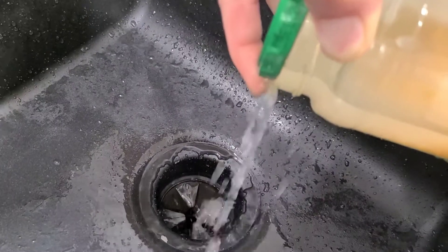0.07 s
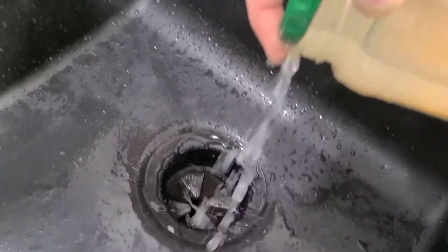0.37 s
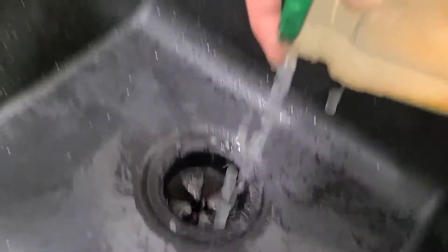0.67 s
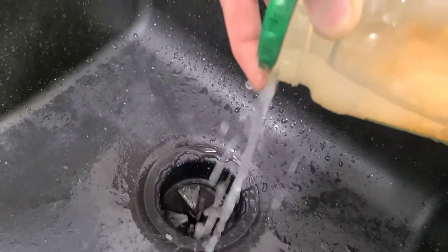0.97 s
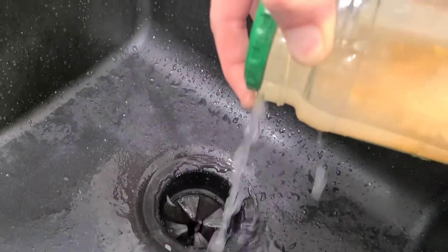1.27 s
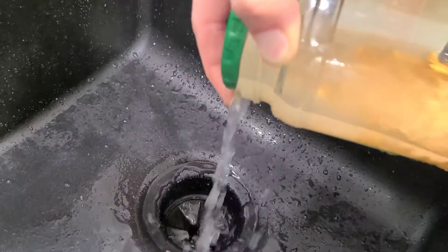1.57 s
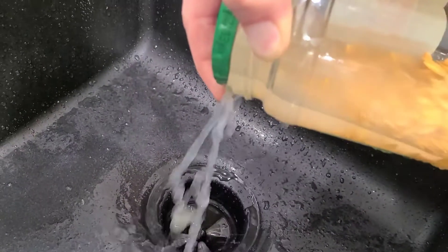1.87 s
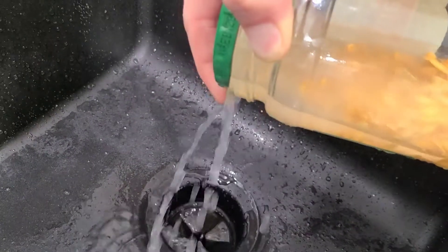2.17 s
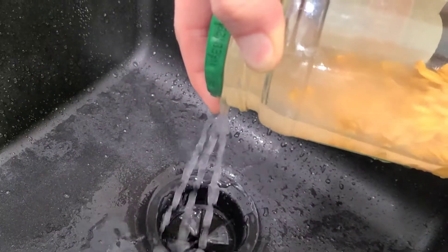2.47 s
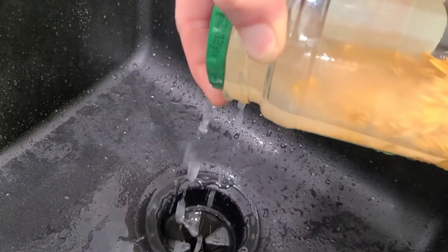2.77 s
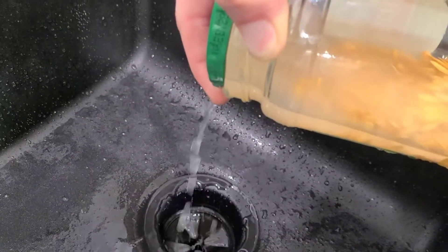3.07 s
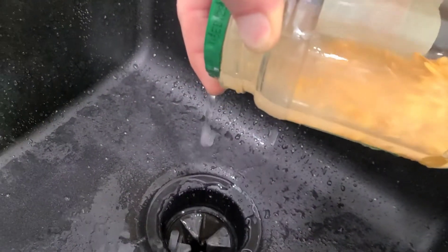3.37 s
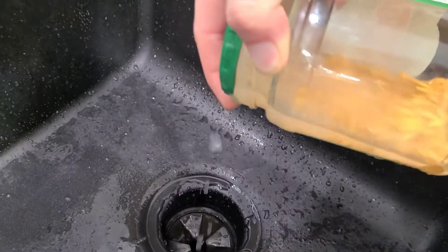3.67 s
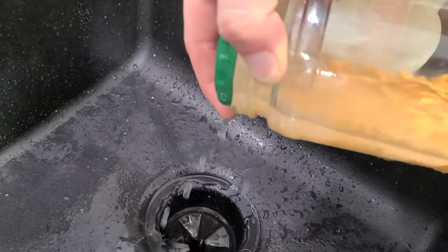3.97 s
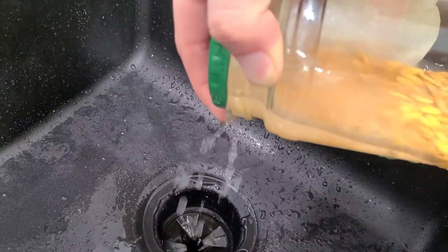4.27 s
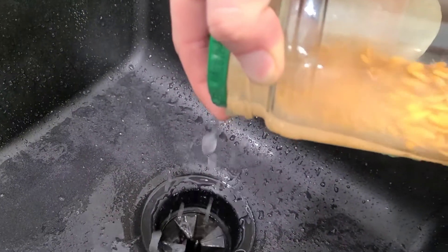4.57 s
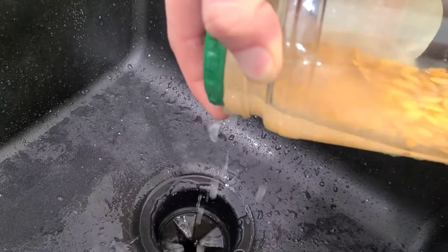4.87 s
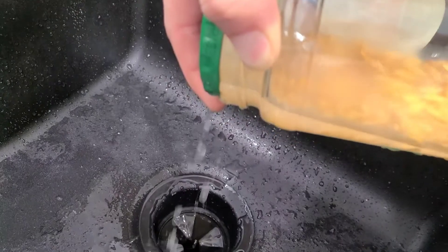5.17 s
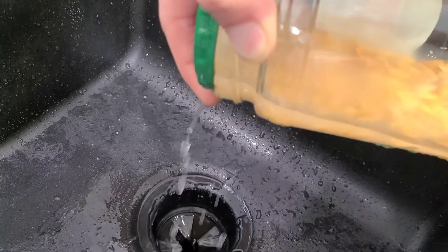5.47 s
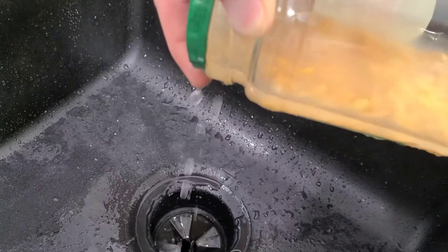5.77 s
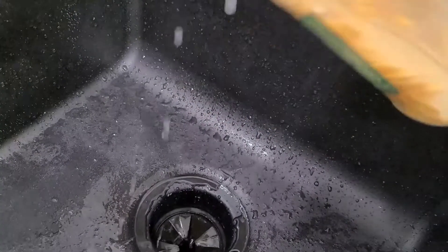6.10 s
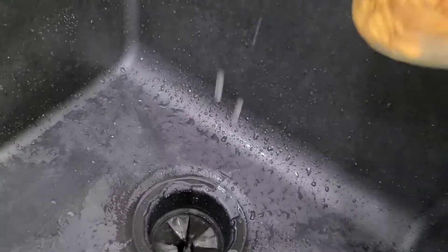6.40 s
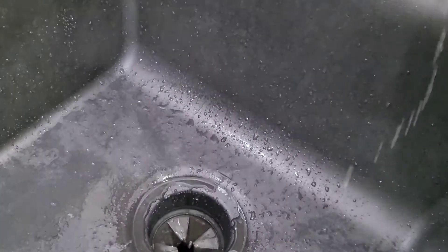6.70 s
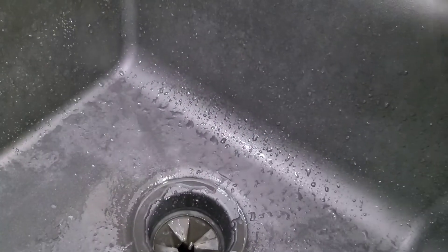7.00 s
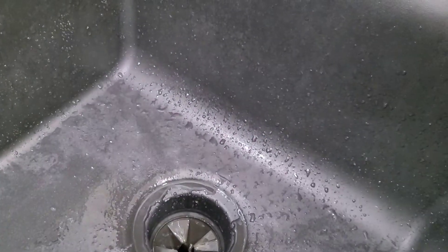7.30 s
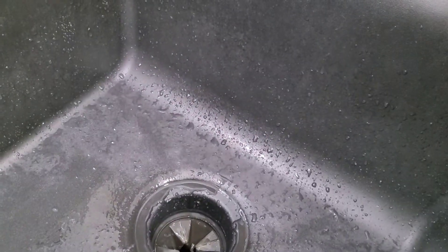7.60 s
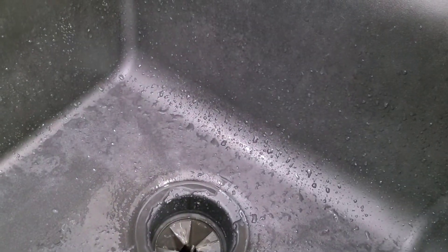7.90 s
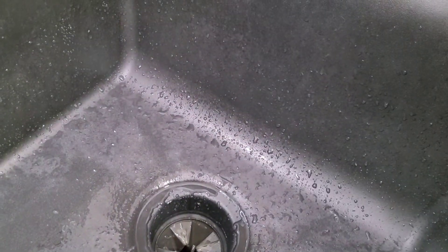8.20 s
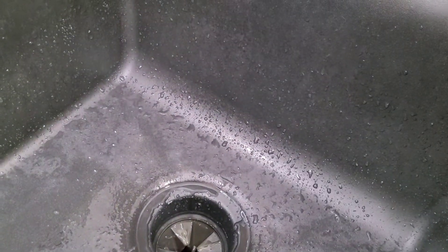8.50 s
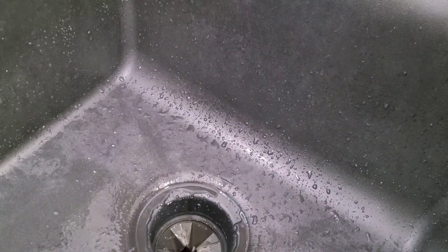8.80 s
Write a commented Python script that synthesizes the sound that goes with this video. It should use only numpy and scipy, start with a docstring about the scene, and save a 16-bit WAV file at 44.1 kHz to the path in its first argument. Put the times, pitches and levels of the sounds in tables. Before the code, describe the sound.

From the start, water poured from a plastic jar splatters unevenly into a kitchen sink, close to the microphones. Crisp splats hit the wet basin, mixed with tiny high bubbles, low plops on the rubber drain flaps and a soft gurgle. The drain gives a small gulp at about 2.5 seconds. From around 3 seconds the stream thins to irregular drips, and the jar gives a faint slosh and a few light ticks near 3.5 seconds. The dripping ends at about 6.7 seconds.

At 7.2 seconds the jar is set on the counter with a sharp, hollow knock, followed by soft bumps. A lid clacks at 8 seconds, and a dish clanks brightly several times around 8.5 seconds, with one last dull bump after it. These knocks sit slightly to the right and carry a short room echo. A faint low kitchen hum continues throughout.

```python
"""Water splats into a kitchen sink, strained out of a plastic jar close to a stereo microphone pair.
The broken stream cracks on the wet basin, drums on the rubber flaps of the drain and traps small
bubbles, then thins to drips. Afterwards the jar is set down on the counter, a lid clacks and a dish
clanks, a little to the right. Behind it all the kitchen hums faintly."""
import sys
import numpy as np
from scipy import signal
from scipy.fft import rfft, irfft, next_fast_len
from scipy.io import wavfile
from scipy.ndimage import uniform_filter1d

SR = 44100
rng = np.random.default_rng(int(sys.argv[2]) if len(sys.argv) > 2 else 0)


def wrap_up_sound(samples):
    """Save the sound to the file named by the first command line argument, as 16-bit audio."""
    columns = np.atleast_2d(samples).T
    # keep every value between -1 and 1, then stretch to whole-number steps
    tamed = np.clip(columns, -1, 1)
    steps = np.round(tamed * 32767).astype(np.int16)
    wavfile.write(sys.argv[1], SR, steps)


N = 390285
POUR_END_S = 6.55

# The pour at the sink, from a stream down to drips: time_s, level_db
POUR_FLOW = [(0.0, -48.5), (0.39, -59), (0.97, -50), (1.75, -59.5), (2.14, -54), (2.35, -57), (2.67, -48.5),
             (3.47, -75.5), (3.77, -68.5), (3.86, -70), (4.44, -74.5), (4.63, -70), (4.79, -75),
             (5.58, -73.5), (5.75, -90), (6.7, -76)]


def pour_strength(full_pour_db=-56.5):
    """The flow at every sample, in dB relative to a full pour."""
    return curve(POUR_FLOW) - full_pour_db


def lesser_drops(flow_db, per_s, level_db, follow, spread_db):
    """The stream pinches off drops at a loose pace, weaker as it thins: start_s, level_db."""
    slots = np.arange(0, POUR_END_S, 1 / per_s)
    late, size = rng.random((200, 2))[:len(slots)].T
    when = np.minimum(slots + late / per_s, POUR_END_S)
    return zip(when, level_db + follow * flow_db[(when * SR).astype(int)] + spread_db * (size - .5))


# The largest slugs on the basin, close up: start_s, level_db, body_relative_db, fizz_relative_db
BASIN_SPLATS = [(0.0248, -39.5, 0, 14), (0.042, -32, -18, -8), (0.054, -38, 3.5, 0),
                (0.3175, -33.5, -19, 11), (0.4186, -37, -28, -21), (0.606, -21, -1, 4),
                (0.645, -29.5, -4.5, 4.5), (0.7387, -30, -20, -2), (0.826, -32, -2, -2),
                (0.849, -25.5, -7.5, 9), (0.8978, -27, -5, 4), (0.991, -28.5, -16, 10),
                (1.096, -34, -3, -15), (1.122, -27.5, -17, -5), (1.289, -46.5, -17, 17),
                (1.3233, -31.5, -11, 7), (1.485, -20.5, -20, 1), (1.6412, -38.5, -30, 1),
                (1.755, -39, -11, -1), (1.8288, -30, -12, -4), (2.0262, -29, -8.5, 0),
                (2.047, -30, -11, 6.5), (2.123, -31, -8, -3), (2.147, -27.5, -6.5, -5),
                (2.174, -26.5, -26, 1), (2.282, -35, 1.5, -21), (2.439, -27, -15.5, -4.5),
                (2.4628, -33, -18, 8.5), (2.499, -33, -6.5, 5.5), (2.552, -23.5, -18, -14),
                (2.657, -28.5, -12, -19), (2.711, -32.5, -10, 10), (2.9953, -35, -16, -10),
                (3.0673, -41.5, -18, 2), (3.088, -50.5, -4, 14), (3.218, -37, -30, -16),
                (3.6836, -33.5, -13, -5), (3.9712, -40, -21, 2), (4.395, -35.5, -20, -13),
                (4.455, -33.5, -11, -0.5), (4.555, -42, -16, -25), (4.624, -40, -2, -7),
                (4.6483, -45, -15, 6), (4.698, -43, -18, 0), (4.8928, -43, -27, -25),
                (5.1038, -32.5, -32, 7.5), (5.191, -35, -13, -14), (5.5948, -45, -13, 12),
                (5.6196, -31.5, -16.5, -2), (6.0132, -45, -6, -5)]


def splats(flow_db, attack_ms=0.5, decay_ms=3.47, fizz_ms=3.45, scatter_ms=14):
    """Each slug bursts with a crack and a fizz of tiny bubbles; the droplets it throws land just after."""
    out, ms = np.zeros((2, N)), np.arange(4096) * 1000 / SR
    drops = lesser_drops(flow_db, per_s=11, level_db=-42.5, follow=0.42, spread_db=5.5)
    small = [(s, db, -11.5, rng.normal(-8, 9)) for s, db in drops]
    attack = 1 - np.exp(-ms / attack_ms)
    for s, db, body_db, fizz_db in BASIN_SPLATS + small:
        body = noise([(1200, -58), (2300, -8), (3100, 2), (4400, 8), (5600, -15)], len(ms))
        snap = noise([(3500, -28.5), (5000, -4.5), (6500, 8), (7300, 6), (8400, -12.5), (11000, -31)],
                     len(ms))
        fizz = noise([(6000, -45), (8500, -9), (10500, -7), (12500, 1.5), (16000, 1)], len(ms))
        foam = ragged(spread_db=4, count=56)
        flicker = unit(uniform_filter1d(rng.standard_normal(len(ms)), 60))
        scatter = amp(-18) * np.exp(0.66 * flicker - ms / scatter_ms)
        crack = colour(snap + amp(body_db) * body, foam) * (1.44 * np.exp(-ms / decay_ms) + scatter)
        froth = amp(fizz_db + 3) * colour(fizz, foam) * (1.07 * np.exp(-ms / fizz_ms) + scatter)
        add(out, s - .0004, amp(db + 4) * attack * (crack + froth) / 2)
    return out


# Heavy drops on the drain flaps: start_s, level_db, tap_relative_db
FLAP_DROPS = [(0.493, -26.5, -22), (0.640, -36, -24), (0.690, -33, -17), (0.88, -27.5, -10),
              (1.221, -26.5, -23), (1.662, -34, -12), (1.723, -32, -21), (1.761, -29.5, -21),
              (1.790, -28, -17.5), (2.117, -23, -20), (2.234, -23, -14), (2.592, -34, -18),
              (2.779, -32, -18), (2.792, -27.5, -30), (2.87, -35, -20), (3.435, -36, -26),
              (3.637, -39, -9.5), (4.043, -31.5, -21), (4.379, -33, -12), (4.469, -21, -12),
              (4.527, -30, -21), (4.548, -30.5, -26), (4.69, -31.5, -18), (4.890, -38.5, -20),
              (5.129, -35.5, -24), (5.34, -35, -23), (5.574, -36.5, -20), (5.793, -25.5, -16.5),
              (6.019, -32.5, -19), (6.418, -37.5, -10.5), (6.517, -35, -15), (6.64, -34.5, -13)]
# The hollow under the flaps, and the rubber itself: pitch_hz, level_db, t60_s
HOLLOW_MODES = [(203.1, 3, 0.13), (213, -12.5, 0.045), (322.3, -13, 0.11), (445, -15, 0.041)]
FLAP_MODES = [(1859, -4, 0.12), (1934, 3, 0.11), (2230, -17.5, 0.064), (2820, -6, 0.079),
              (1210, -9.5, 0.093)]


def plops(flow_db, swell_ms=5, slap_ms=5, light_tap_db=-18):
    """Each drop slaps a rubber flap at another spot; the hollow below swells into a low note."""
    out, t = np.zeros((2, N)), np.arange(SR // 5) / SR
    drops = lesser_drops(flow_db, per_s=2.6, level_db=-41, follow=.1, spread_db=6)
    light = [(s, db, light_tap_db) for s, db in drops]
    slap_spectrum = [(300, -6), (900, 11.5), (1400, -15.5), (2400, -12), (3200, 3.5), (6000, -19.5)]
    for s, db, tap_db in FLAP_DROPS + light:
        boom = ring(HOLLOW_MODES, t * rng.uniform(0.99, 1.03)) * (1 - np.exp(-t * 1000 / swell_ms))
        spot = [(hz * rng.uniform(0.95, 1.045), mode_db + rng.normal(0, 5), t60)
                for hz, mode_db, t60 in FLAP_MODES]
        slap = noise(slap_spectrum, len(t)) * np.exp(-t * 1000 / slap_ms)
        tap = ring(spot, t) + amp(-1) * slap
        add(out, s, amp(db) * (amp(2) * boom + amp(tap_db - 2) * tap))
    return out


def bubble(hz, decay_ms, rise_octaves):
    """A trapped bubble rings and goes up in pitch as it nears the surface."""
    ms = np.arange(2400) * 1000 / SR
    pitch = hz * 2 ** (rise_octaves * (1 - np.exp(-ms / 10)))
    mic_phase = np.array([[-1], [1]]) * rng.uniform(-0.8, 1)
    envelope = np.exp(-ms / decay_ms) * (1 - np.exp(-ms / .5))
    return envelope * np.sin(2 * np.pi * np.cumsum(pitch) / SR + mic_phase)


# Bubbles that stand out in the basin: start_s, pitch_hz, level_db, rise_octaves
CLEAR_BUBBLES = [(0.607, 6360, -15.5, 0.05), (0.691, 2770, -32, 0.04), (0.829, 5680, -29, 0.11),
                 (1.486, 6830, -20, 0.084), (1.807, 3900, -26, 0.71), (2.128, 3940, -27, 0.36),
                 (2.138, 2760, -28.5, 0.33), (2.551, 4100, -29.5, 0.33), (2.676, 2940, -34.5, 0.28),
                 (6.035, 5500, -39.5, 0.066), (6.418, 4490, -36, 0.21)]


def bubbles(flow_db, tiny_db=-44, follow=0.85, spread_db=6, tiny_hz=6500, lower_hz=3600, count=320):
    """A few clear bubbles and many tiny ones; a strong stream traps larger, lower ones too."""
    out = np.zeros((2, N))
    for s, hz, db, rise in CLEAR_BUBBLES:
        add(out, s, amp(db + 2) * bubble(hz, decay_ms=4.1, rise_octaves=rise))
    for when, pitch, detune, size, life in rng.random((count, 5)):
        s = when * POUR_END_S
        pour_db = flow_db[int(s * SR)]
        strength = np.clip(0.713 + pour_db / 24, 0, 1)
        hz = tiny_hz * (1 + 0.15 * (detune - .5)) - lower_hz * strength * pitch ** 2
        db = tiny_db + follow * pour_db + spread_db * size ** 2
        add(out, s, amp(db) * bubble(hz, decay_ms=0.56 + 1.6 * life, rise_octaves=0))
    return out


def pips(flow_db, pitch_hz=6650):
    """Small drops of much the same size each trap one bubble, so their pips share nearly one pitch."""
    out = np.zeros((2, N))
    for s, db in lesser_drops(flow_db, per_s=11, level_db=-36, follow=0.46, spread_db=10):
        hz = pitch_hz * (1 + .07 * rng.uniform(-1, 1))
        add(out, s, amp(db) * bubble(hz, decay_ms=3.05, rise_octaves=0.027))
    return out


# Drops that ping down in the drain: start_s, level_db
DRAIN_PINGS = [(2.0, -43), (2.027, -35.5), (2.391, -45), (2.829, -44), (2.868, -42), (3.968, -36),
               (6.528, -44.5)]
# The ring they set off: pitch_hz, level_db, t60_s
PING_MODES = [(3530, 0, .12), (3370, -7, .08), (3240, -9, .1)]


def pings(attack_ms=0.95, detune=0.0066):
    """Some drops set off the same thin, longer ring in the drain."""
    out, t = np.zeros((2, N)), np.arange(SR // 5) / SR
    attack = 1 - np.exp(-t * 1000 / attack_ms)
    for s, db in DRAIN_PINGS:
        tuning = 1 + detune * rng.standard_normal()
        add(out, s, amp(db - 2) * ring(PING_MODES, t * tuning) * attack)
    return out


def clumps(per_s, spread_db, decay_ms, steady):
    """The stream breaks into lumps; each lands with a sudden flurry that dies away."""
    lumps = amp(spread_db * np.minimum(rng.exponential(1, N), 3)) * (rng.random(N) < per_s / SR)
    flurry = signal.lfilter([1], [1, -np.exp(-1000 / (decay_ms * SR))], lumps)
    return unit(steady + unit(flurry))


# Spray and patter on the basin, gurgle down in the drain: frequency_hz, level_db
SPRAY_SPECTRUM = [(5000, -44), (7000, 0.5), (8600, -19.5), (10500, -7), (13000, 3), (16000, -4.5)]
PATTER_SPECTRUM = [(300, 10), (1000, -14), (2200, -2), (3500, 0.5), (5000, -6.5), (6600, 7), (8000, -6),
                   (10000, -29)]
GURGLE_SPECTRUM = [(120, -17), (200, 14), (350, 5.5), (540, 2.5), (820, -1.5), (1500, -7), (2400, -8.5),
                   (4000, -35), (8000, -57)]


def stream(flow_db, run_off_s=0.19):
    """Fine spray, coarser patter and the gurgle in the drain die away with the pour."""
    running = 1 - swell(POUR_END_S + run_off_s / 2, N / SR, run_off_s)
    pouring = running * clumps(per_s=70, spread_db=4, decay_ms=7, steady=.4)
    surge_db = 0.8 * np.maximum(flow_db, 0)  # extra patter above a full pour
    spray = droplets(SPRAY_SPECTRUM, per_s=3500, spread_db=1) * amp(-51 + flow_db)
    patter = droplets(PATTER_SPECTRUM, per_s=700, spread_db=-3.5) * amp(-57 + 0.67 * flow_db + surge_db)
    gurgle = droplets(GURGLE_SPECTRUM, per_s=400, spread_db=5.5) * amp(-52.5 + 0.24 * flow_db)
    return pouring * (spray + patter) + running * gurgle


# The hollow of the drain as it swallows: frequency_hz, level_db
GULP_SPECTRUM = [(150, -16), (300, 9), (560, -5), (820, 8), (1100, -5), (1500, -2), (2000, -9), (2450, 3),
                 (3200, -21), (6000, -35)]


def gulp():
    """The drain swallows one gush."""
    gush = swell(start_s=2.465, length_s=0.11, fade_s=.04)
    return droplets(GULP_SPECTRUM, per_s=600, spread_db=3) * amp(-43.5) * gush


# Water shifting in the jar above the sink: time_s, level_db
SLOSH_LEVEL = [(3.12, -75), (3.2, -52.5), (3.26, -48), (3.32, -53), (3.42, -64)]
# The hollow of the jar: frequency_hz, level_db
SLOSH_SPECTRUM = [(200, -15), (400, 11.5), (550, -4), (690, 14.5), (900, -22), (2000, -47)]


def slosh():
    """Water stirs faintly inside the tilted jar and sloshes once."""
    return droplets(SLOSH_SPECTRUM, per_s=440, spread_db=2.5) * amp(curve(SLOSH_LEVEL))


def knocks(blows, modes, contact, low_t60_s, high_t60_s, attack_ms, lag_rad, gain_db):
    """Each blow is a burst of contact noise plus the object's modes; soft blows lose their treble."""
    out, t = np.zeros((2, N)), np.arange(SR // 2) / SR
    overtones = ragged(spread_db=6, count=260)  # the object's crowded high modes
    attack = 1 - np.exp(-t * 1000 / attack_ms)
    for s, db, cutoff_hz, ring_db in blows:
        burst = noise(contact, len(t))
        low = colour(burst, [(2000, -1.5), (4500, -41), (9000, -48.5)])
        high = 0.72 * colour(burst - low, overtones)
        crack = low * amp(-60 * t / low_t60_s) + high * amp(-60 * t / high_t60_s)
        blow = (crack + amp(ring_db) * ring(modes, t, lag_rad)) * attack
        lowpass = signal.butter(2, cutoff_hz, fs=SR)
        add(out, s, amp(db + gain_db) * signal.lfilter(*lowpass, blow))
    return out


# The jar in the hand, then on the counter: start_s, level_db, cutoff_hz, ring_relative_db
JAR_TICKS = [(3.394, -37, 8750, -17), (3.481, -38, 1200, -19), (3.495, -32, 9000, -26),
             (7.607, -42, 3970, -22)]
JAR_BLOWS = [(7.1845, -11, 15000, 1.5), (7.193, -23, 2500, -6)]
# Its plastic body: pitch_hz, level_db, t60_s
JAR_MODES = [(128, 2, 0.11), (293, -16, 0.18), (376, -10.5, 0.34), (439.6, 4.5, 0.19), (532, -3, 0.23),
             (674, 8.5, 0.1), (723, -16, 0.13), (905, 5.5, 0.17), (1040, 2, 0.13), (1185, 4, 0.11),
             (1180, 0, .11), (1533, -15, 0.24), (1804, -11, .12), (2035, -10, 0.33), (2555, -4, 0.092),
             (3750, -26.5, 0.15)]
# Contact noise of a tick and of a blow: frequency_hz, level_db
TICK_CONTACT = [(150, -4), (500, 9.5), (1200, 0.5), (3300, -7.5), (6000, -19.5), (14000, -42)]
JAR_CONTACT = [(30, -31), (70, -26.5), (200, -15.5), (420, -11), (950, -11), (1500, -18), (2100, -17.5),
               (2900, -24.5), (3900, -14), (4600, -31), (5500, -23.5), (7000, -29), (9000, -48.5),
               (14000, -38.5)]


def jar_ticks():
    """The plastic jar ticks as it is handled, barely ringing."""
    return knocks(JAR_TICKS, JAR_MODES, TICK_CONTACT,
                  low_t60_s=0.018, high_t60_s=0.06, attack_ms=0.078, lag_rad=0.65, gain_db=4.5)


def jar_set_down():
    """The jar meets the counter in a quick double knock."""
    return knocks(JAR_BLOWS, JAR_MODES, JAR_CONTACT,
                  low_t60_s=0.28, high_t60_s=0.063, attack_ms=0.83, lag_rad=0.64, gain_db=0.5)


# The lid, a little right of the microphones: start_s, level_db, cutoff_hz, ring_relative_db
LID_BLOWS = [(7.9785, -19.5, 18000, 0), (7.990, -23, 5000, -14)]
# Its ring: pitch_hz, level_db, t60_s
LID_MODES = [(366, -12.5, 0.11), (647, -8, 0.052), (1215, -7.5, 0.11), (1686, -15, 0.11), (2120, -1, 0.048),
             (2340, -7, 0.081), (2420, -10.5, 0.14), (2500, -22, .2), (3130, -18, 0.082),
             (3240, -11, 0.092), (3480, -16, .1), (4380, -16, 0.084), (5300, -27, 0.14), (6170, -29, 0.13)]
# Its contact noise: frequency_hz, level_db
LID_CONTACT = [(150, -41), (350, -9), (900, -14), (1600, -17), (2400, -0.5), (3600, -3.5), (5000, -15),
               (6500, -14), (9000, -40), (12000, -20.5), (16000, -23)]


def lid_clack():
    """A lid strikes twice in one short clack."""
    return knocks(LID_BLOWS, LID_MODES, LID_CONTACT,
                  low_t60_s=0.059, high_t60_s=0.055, attack_ms=1.9, lag_rad=0.62, gain_db=3.5)


# The dish, also a little to the right: start_s, level_db, cutoff_hz, ring_relative_db
DISH_BLOWS = [(8.444, -26.5, 12400, 6.3), (8.456, -20, 18000, 4.6), (8.544, -35, 4000, 2.7),
              (8.576, -14, 18200, 2.1), (8.596, -16, 18000, 1.4)]
# Its ring: pitch_hz, level_db, t60_s
DISH_MODES = [(370, -0.5, 0.28), (443.6, -3, 0.23), (722, 0, 0.14), (1040, -6, 0.15), (1272, 11.5, 0.13),
              (1610, -28, 0.61), (2260, 7, 0.065), (2340, -9, 0.099), (2577, 11, 0.081), (3000, -28, 0.2),
              (3110, -11, 0.13), (3280, -5.5, 0.24), (3370, -0.5, 0.17), (4242, -19, 0.23),
              (4400, -25, 0.45), (4730, -28, 0.19), (5500, -35, .25), (5744, -27, 0.2), (6126, -18, 0.26),
              (6420, -34, 0.15), (6860, -23, .24), (7580, -23, 0.14), (11600, -16, 0.11), (13800, -13, 0.1)]
# Its contact noise: frequency_hz, level_db
DISH_CONTACT = [(150, -31), (380, 1.5), (560, -8.5), (750, -6.5), (1700, -9.5), (2500, -3), (3400, -2.5),
                (3800, -18), (4700, -12), (6500, -10), (9000, -27.5), (12500, -14), (16000, -19)]


def dish_clank():
    """A dish rings brightly under a quick run of blows."""
    return knocks(DISH_BLOWS, DISH_MODES, DISH_CONTACT,
                  low_t60_s=0.15, high_t60_s=0.12, attack_ms=3.4, lag_rad=0.51, gain_db=2)


# Soft bumps among the knocks: start_s, level_db, cutoff_hz, ring_relative_db
SOFT_BUMPS = [(7.399, -33, 1290, 7), (7.408, -34.5, 1200, 4), (7.459, -40.5, 1200, 2),
              (7.560, -49, 885, 10.5), (7.779, -42, 1260, 11), (8.554, -33, 1300, 4.5),
              (8.800, -32.5, 1420, 6.5)]
# Their dull ring: pitch_hz, level_db, t60_s
BUMP_MODES = [(421, -9.5, 0.24), (525, 2.5, 0.096), (614, 7, 0.047), (733, -3, 0.081), (880, -6.5, 0.082),
              (1160, -9.5, 0.1)]


def bumps():
    """The things being handled bump softly, with little treble."""
    return knocks(SOFT_BUMPS, BUMP_MODES, JAR_CONTACT,
                  low_t60_s=0.11, high_t60_s=0.076, attack_ms=1.7, lag_rad=0.41, gain_db=6)


# Room tone behind the sink: frequency_hz, level_db
AIR_SPECTRUM = [(20, -32), (32, -11.5), (55, 1), (100, -2.5), (170, -9.5), (260, -19), (400, -16.5),
                (550, -20.5), (1050, -15.5), (2000, -22), (3000, -29.5), (5000, -36.5), (6700, -32),
                (9000, -60.5), (13000, -45.5)]
# Swells of the background hum: start_s, length_s
HUM_SWELLS = [(.2, 1.0), (2.0, 1.36), (5.85, 0.59)]


def kitchen(air_db=-48.5, hum_db=-54, swell_db=8):
    """Steady room air and a wavering low hum that swells now and then."""
    hum = noise([(60, -61), (112, -27), (124, 3), (130, 4), (138, 0.5), (160, -35), (300, -80)], N)
    louder = sum(swell(s, length, fade_s=0.17) for s, length in HUM_SWELLS)
    return amp(air_db) * noise(AIR_SPECTRUM, N) + amp(hum_db + swell_db * louder) * hum


def droplets(spectrum, per_s, spread_db):
    """Tiny random impacts, rms 1; a positive spread makes a few louder, a negative one a few softer."""
    clicks = np.zeros((2, N))
    when, side, sign, size = rng.random((int(2 * per_s * N / SR), 4)).T
    strength = amp(-spread_db * np.log(size + 0.018))
    clicks[(2 * side).astype(int), (when * N).astype(int)] = np.sign(sign - .5) * strength
    return unit(colour(clicks, spectrum))


def ring(modes, t, lag_rad=0.37):
    """Dying modes, t60 capped at 0.6 s; the right microphone leads the left by twice lag_rad."""
    mic_phase = np.array([[-lag_rad], [lag_rad]])
    out = sum(amp(db - 60 * t / min(t60, .6)) * np.sin(2 * np.pi * hz * t + mic_phase)
              for hz, db, t60 in modes)
    return out / np.sqrt(sum(amp(db) ** 2 for _, db, _ in modes) / 2)


def echoes(x, t60s, delay_s, size):
    """Sparse reflections of random sign, each band dying at its own speed."""
    taps = rng.choice([-1., 1.], (2, size)) * (rng.random((2, size)) < .1)
    hz, t, bands = signal.stft(taps, SR, nperseg=128)
    decay = amp(-60 * t / read(t60s, hz)[:, None])
    tail = signal.istft(bands * decay, SR, nperseg=128)[1]
    tail[:, :round(delay_s * SR)] = 0
    tail /= np.linalg.norm(tail, axis=1, keepdims=True)
    return signal.oaconvolve(x, tail, axes=1)[:, :N]


def amp(db):
    """Decibels to gain."""
    return 10 ** (np.asarray(db) / 20)


def unit(x):
    """Scales to rms 1."""
    return x / np.sqrt(np.mean(x ** 2) + 1e-20)


def read(points, hz):
    """Reads a table on a log-frequency axis."""
    f, value = np.transpose(points)
    return np.interp(np.log(hz + 1), np.log(f + 1), value)


def curve(rows):
    """A time table at every sample."""
    return np.interp(np.arange(N) / SR, *np.transpose(rows))


def swell(start_s, length_s, fade_s):
    """Rises from 0 to 1 and falls back, with length_s between the fades' midpoints."""
    t = np.arange(N) / SR - start_s
    return np.clip(np.minimum(t, length_s - t) / fade_s + .5, 0, 1)


def add(mix, s, sound):
    """Mixes a sound in at second s."""
    part = mix[:, max(round(s * SR), 0):][:, :sound.shape[-1]]
    part += sound[..., :part.shape[1]]


def colour(x, spectrum):
    """Filters by a spectrum table."""
    size = next_fast_len(x.shape[-1])
    gain = amp(read(spectrum, np.fft.rfftfreq(size, 1 / SR)))
    return irfft(rfft(x, size) * gain, size)[..., :x.shape[-1]]


def noise(spectrum, size):
    """Two channels of coloured noise, rms 1."""
    return unit(colour(rng.standard_normal((2, size)), spectrum))


def ragged(spread_db, count):
    """A spectrum table of many small random resonances, evenly spaced."""
    level_db = spread_db * np.clip(rng.standard_normal(count), -2, 2)
    return np.column_stack([np.linspace(0, SR / 2, count), level_db])


def pan(x, left_db):
    """Leans a sound to the left, or to the right if negative."""
    return x * amp(np.array([[left_db], [-left_db]]) / 2)


# The kitchen's reverberation, heard from the sink: frequency_hz, t60_s
KITCHEN_DECAY = [(100, 0.35), (400, 0.46), (1200, 0.43), (3000, 0.43), (7000, 0.4), (15000, 0.27)]


def scene(basin_db=-7, water_room_db=-18, knock_room_db=-11):
    """Water echoes briefly between the sink walls; the knocks wake the whole kitchen."""
    flow_db = pour_strength()
    water = splats(flow_db) + bubbles(flow_db) + pips(flow_db) + pings()
    water += stream(flow_db) + gulp() + slosh()
    basin = echoes(water, [(500, 0.12), (6500, 0.091), (14000, 0.079)], delay_s=0.0034, size=6000)
    sink = water + amp(basin_db) * basin + plops(flow_db) + jar_ticks()
    handling = jar_set_down() + bumps() + lid_clack() + dish_clank()
    into_room = amp(water_room_db) * sink + amp(knock_room_db) * handling
    room = echoes(into_room, KITCHEN_DECAY, delay_s=0.0043, size=24000)
    return sink + pan(handling, left_db=-2) + room + kitchen()


# Stereo width of the microphone pair: frequency_hz, side_db
MIC_WIDTH = [(100, -23), (200, -11.5), (350, -8.5), (1000, 3), (2400, -1), (5000, 0.5), (6500, -6.5),
             (12000, -7)]


def record(dry, edge_hz=16000):
    """A microphone pair, wide in the middle range and narrow in bass and treble; then the band limit."""
    mid, side = dry.mean(0), colour((dry[0] - dry[1]) / 2, MIC_WIDTH)
    lowpass = signal.firwin(401, edge_hz, window=("kaiser", 8), fs=SR)
    return signal.oaconvolve(np.array([mid + side, mid - side]), lowpass[None], "same")


dry = scene()
out = record(dry)
wrap_up_sound(out)
```